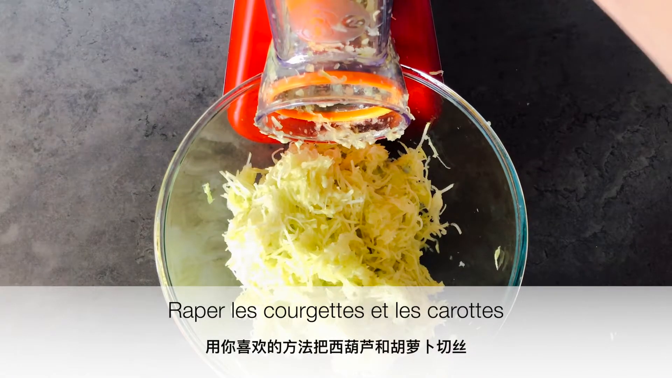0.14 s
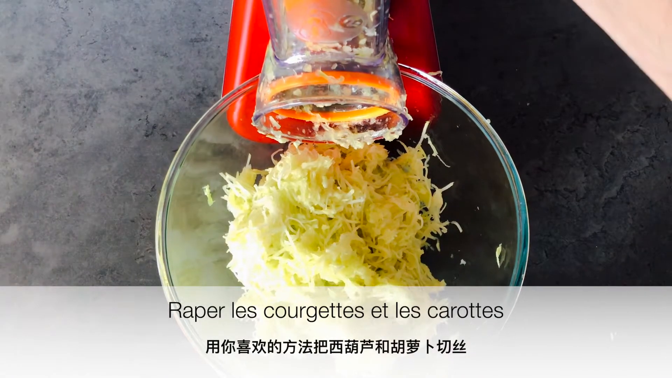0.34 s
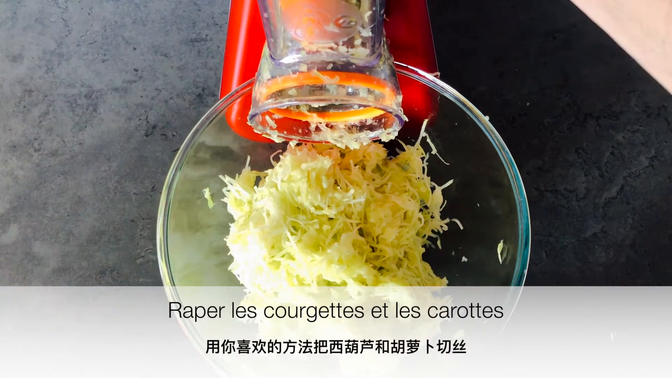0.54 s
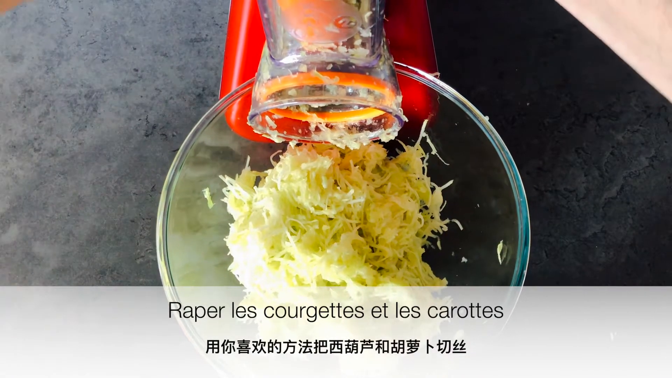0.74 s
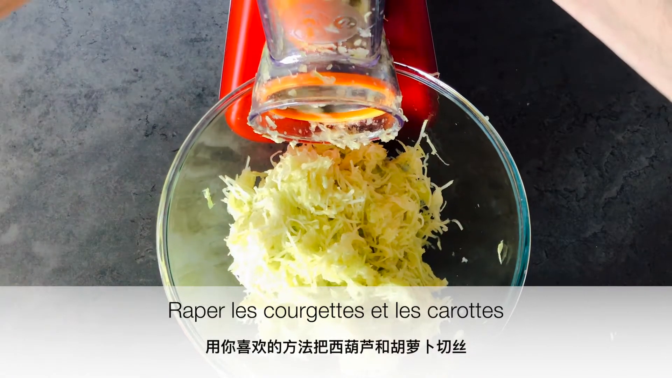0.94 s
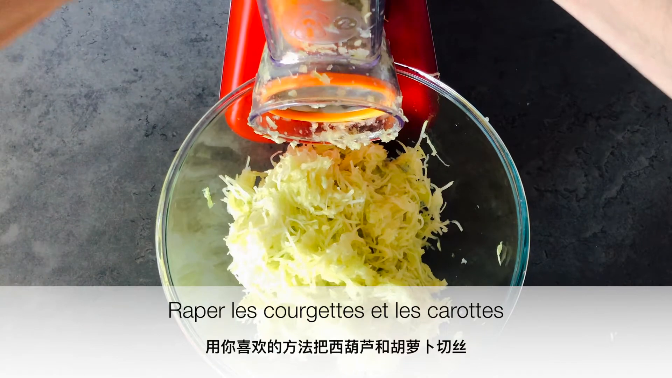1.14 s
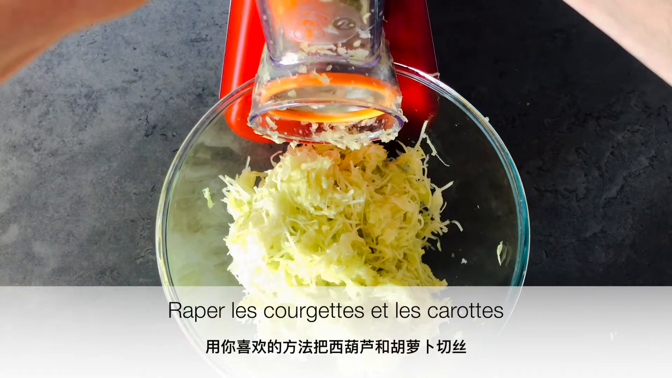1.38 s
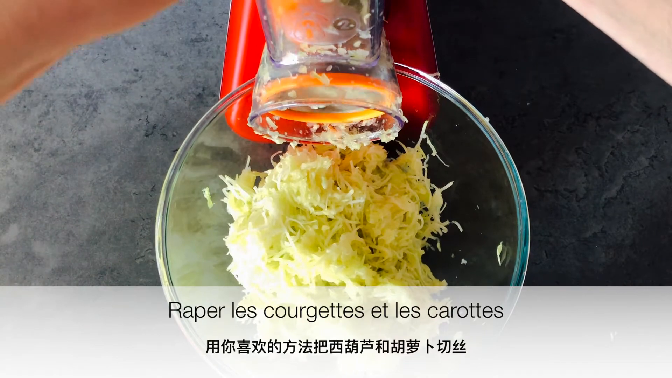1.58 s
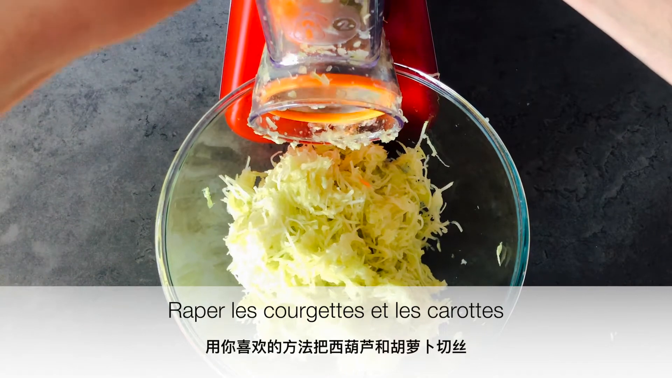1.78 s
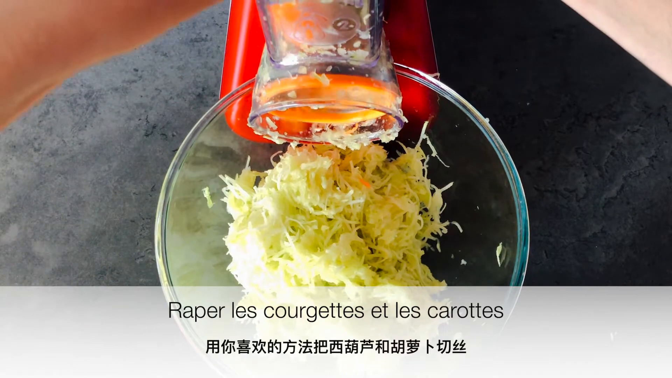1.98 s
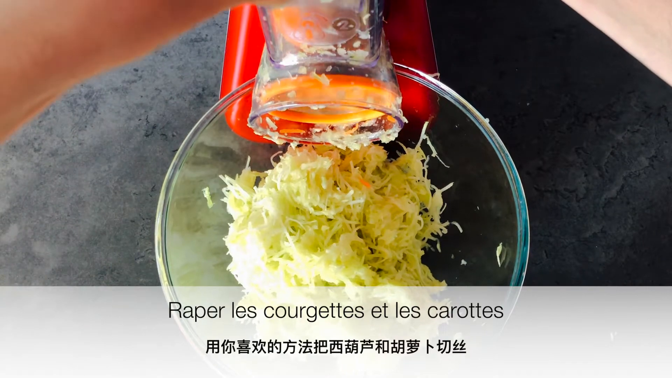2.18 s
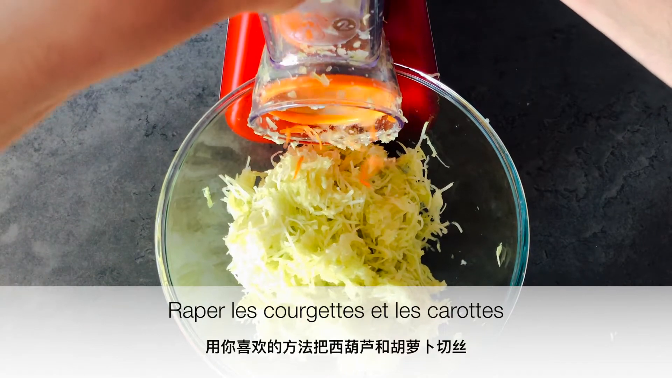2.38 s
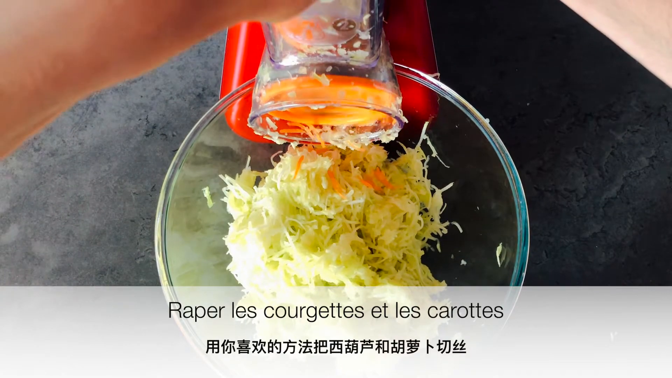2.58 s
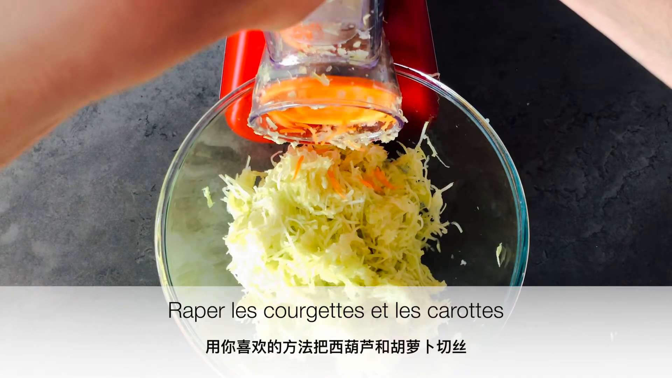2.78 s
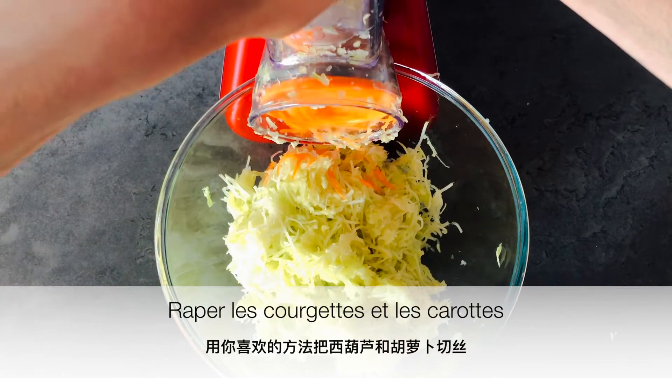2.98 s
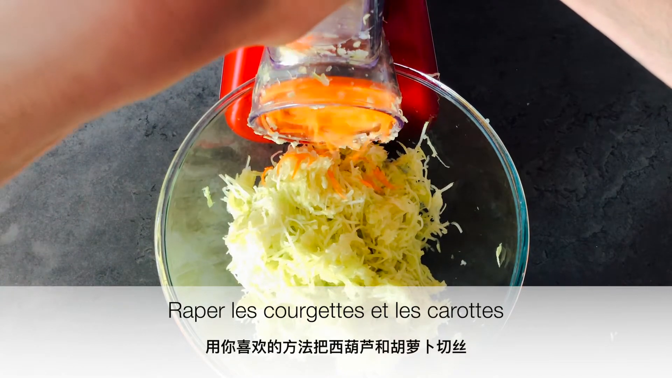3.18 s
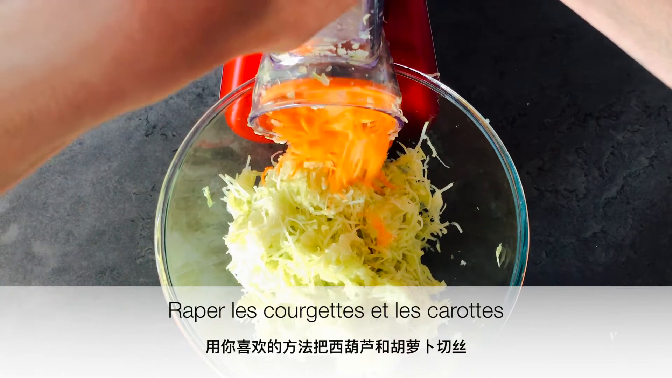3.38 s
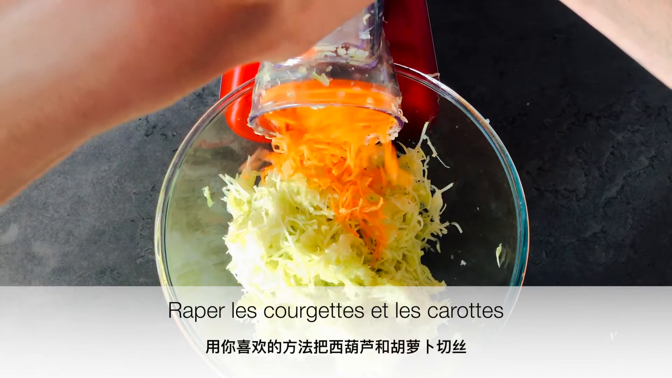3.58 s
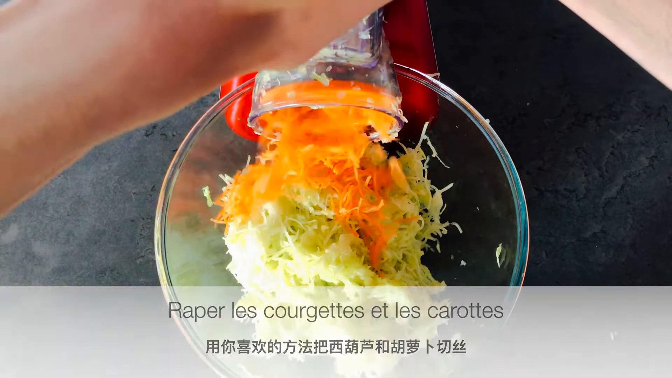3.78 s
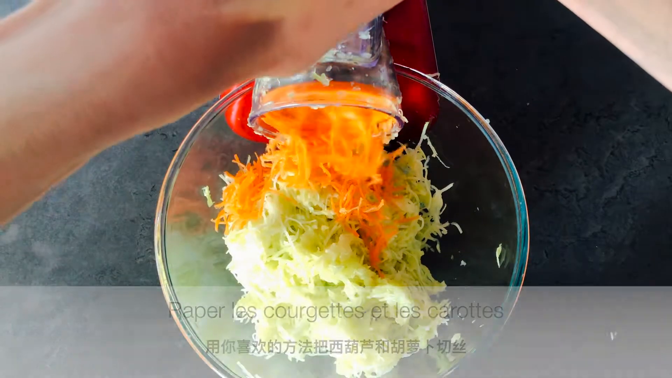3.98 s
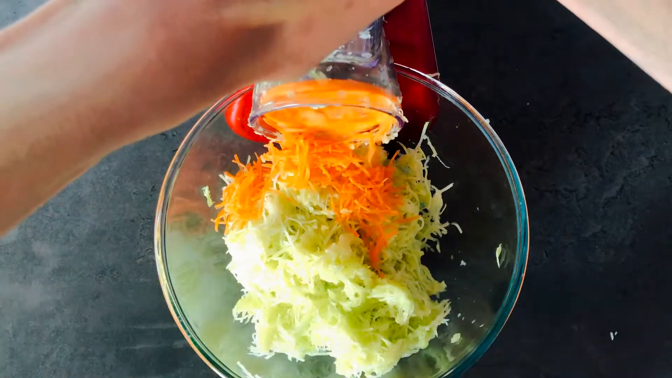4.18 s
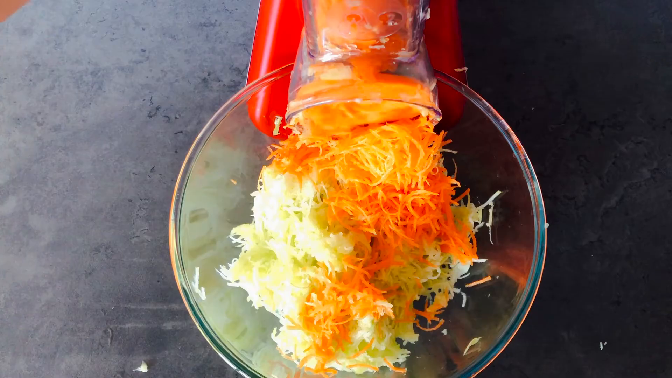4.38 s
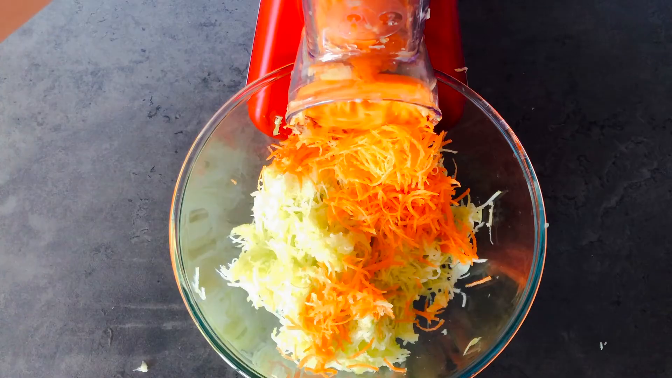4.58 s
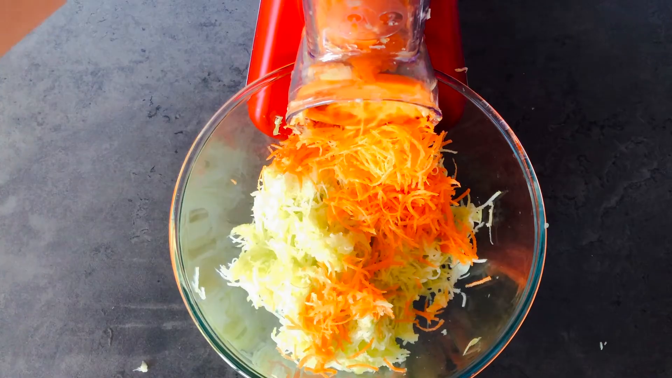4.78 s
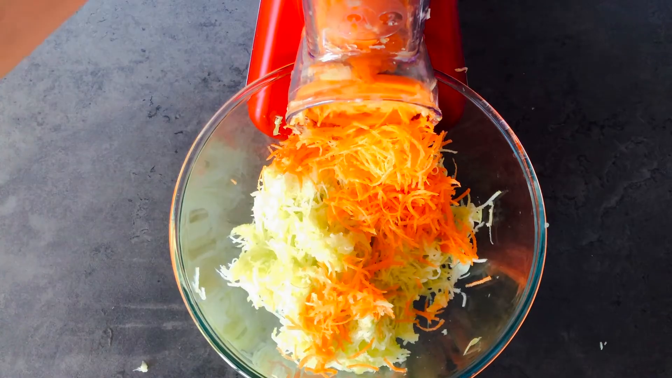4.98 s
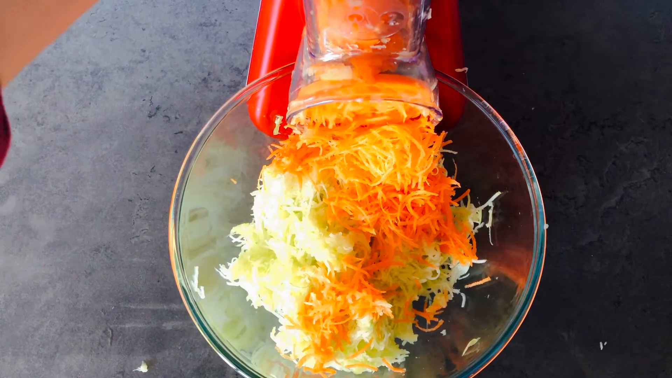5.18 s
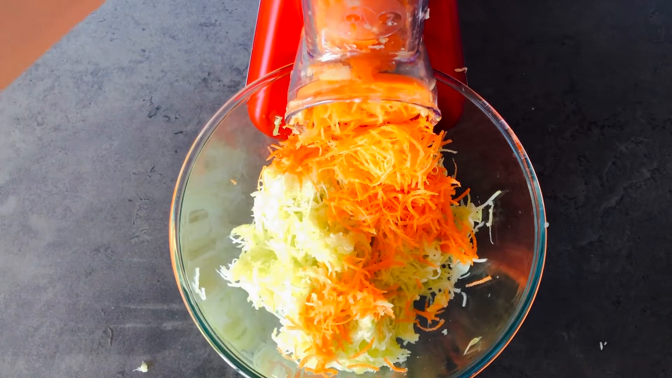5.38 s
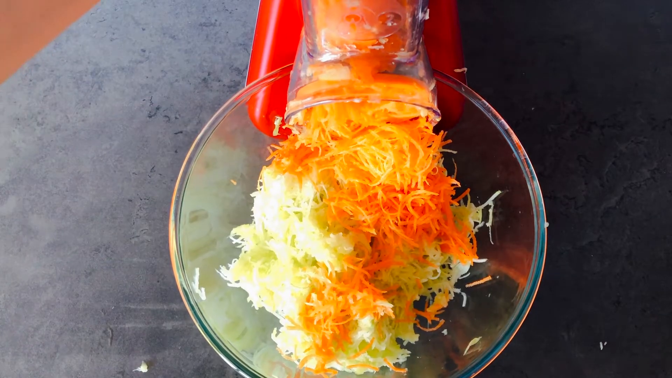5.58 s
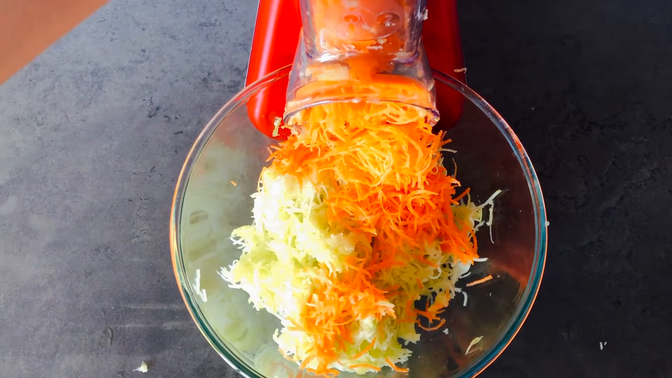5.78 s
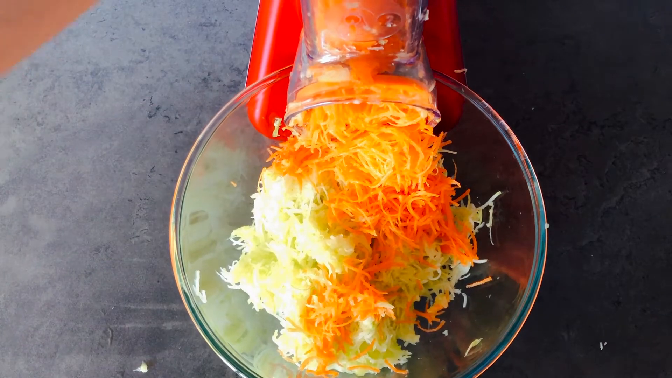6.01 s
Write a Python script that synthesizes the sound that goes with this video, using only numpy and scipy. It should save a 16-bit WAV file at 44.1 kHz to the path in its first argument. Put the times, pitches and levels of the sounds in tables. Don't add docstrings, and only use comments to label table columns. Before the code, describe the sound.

An electric vegetable grater is handled with clicks and thuds, whines up to a steady buzzing grind, then winds down to quiet and final bumps.

```python
import sys
import numpy as np
from scipy import signal
from scipy.fft import rfft, irfft, next_fast_len
from scipy.io import wavfile
from scipy.ndimage import uniform_filter1d

SR = 44100
rng = np.random.default_rng(int(sys.argv[2]) if len(sys.argv) > 2 else 0)


def decibels_to_gain(level_db):
    exponent = np.asarray(level_db, float) / 20
    return 10 ** exponent


def log_audio(samples):
    frames = np.atleast_2d(samples).T
    limited = np.clip(frames, -1, 1)
    pcm = np.round(limited * 32767).astype(np.int16)
    wavfile.write(sys.argv[1], SR, pcm)


N = 266800

PINION, WHEEL, DRUM_PINION = 7, 18, 13
SHAFT_RATIO = PINION / WHEEL
CUT_S = 4.2275
EMPTY_S = 4.11
OFF_S, REST_S = 4.235, 5.2

# (frequency [Hz], density [dB per Hz])
ROOM_COLOUR = [(24, -33.5), (40, -5), (54, -5), (106, -1), (126, -7), (193, -2), (219, -12), (255, -1.5),
               (275, -19.5), (327, -24.5), (410, -21), (766, -45), (15800, -53)]
# (frequency [Hz], t60 [s])
ROOM_DECAY = [(150, 0.58), (500, 0.48), (2000, 0.48), (6000, 0.3), (14000, 0.26)]
# (time [s], level [dB])
RUBS = [
    [(0.0, -77), (0.15, -90.5), (0.398, -95), (0.442, -70), (0.52, -73), (0.564, -77), (0.818, -79.5),
     (0.9, -79)],
    [(5.45, -80), (5.618, -86), (5.716, -90.5), (5.944, -86), (6.05, -71)],
]
# (frequency [Hz], density [dB per Hz])
RUB_COLOUR = [(180, -39), (300, -2), (654, -12.5), (772, -16), (1270, -17), (2060, -27), (2470, -27),
              (2820, -29), (15800, -47.5)]

# (time [s], strength [dB], brightness [dB], length [s])
CLICKS = [(0.3543, -45, -6, 0.0067), (0.376, -51, 4, 0.0058), (0.4732, -54.5, -13, 0.004),
          (0.482, -64, -48, 0.0058), (0.535, -84, 23, 0.005), (0.679, -75.5, 14.5, 0.0056),
          (0.6855, -60.5, 0, 0.0065), (0.772, -78, 9, 0.006), (0.782, -59, 2.5, 0.0052),
          (0.813, -64.5, -5, 0.006), (0.833, -76, 9, 0.004), (0.8635, -73, -24, 0.005),
          (0.898, -55, 7.5, 0.0077), (5.012, -50, 2, 0.0049), (5.536, -78, -12, 0.006),
          (5.897, -67.5, -14.5, 0.0087), (5.931, -66.5, -2, 0.0055), (5.973, -52, -18, 0.0064)]
# (frequency [Hz], width [Hz], gain [dB])
SHELL = [(1200, 110, -6), (1660, 140, 3.5), (2320, 204, -1.5), (2400, 220, -0.5), (3800, 680, 3),
         (4680, 440, 7.5), (7500, 1500, -2)]
# (frequency [Hz], density [dB per Hz])
SHELL_TILT = [(500, 23.5), (6000, -4), (9000, -10), (15000, -15.5)]
# (frequency [Hz], level [dB], t60 [s])
CHUTE_RINGS = [(2590, -19, .6), (2625, -26, .3), (2580, 5, .05), (3920, 7, .028), (1240, -12, .08),
               (2290, -9, .05), (5715, -12, .03), (6720, -12, .04), (7400, -16, .04)]
# (time [s], peak [dB], pitch [Hz], t60 [s])
PINGS = [(0.473, -67, 2550, 0.041), (0.479, -59, 1230, 0.058), (.358, -48, 635, 0.046),
         (.377, -53, 330, 0.036), (.536, -68, 6860, .025), (.537, -80, 6735, .04), (.687, -59, 824, 0.023),
         (0.686, -61, 2830, 0.025), (.688, -61, 3240, 0.019), (.686, -63, 4950, 0.024),
         (.687, -67, 1680, .03), (.773, -69, 3600, .02), (.784, -61.5, 1300, 0.039),
         (0.786, -67, 1604, 0.043), (.784, -75, 3200, 0.035), (.865, -66, 1297, 0.025),
         (.865, -62.5, 554, 0.026), (5.898, -71, 2280, 0.037), (5.9, -74, 1200, .07),
         (5.932, -72, 3800, .03), (5.932, -65, 1060, .04), (5.975, -72, 1630, .05),
         (5.975, -62, 2310, 0.035)]
# (time [s], peak [dB], pitch [Hz], t60 [s])
THUDS = [(0.363, -42.5, 355, 0.05), (0.388, -45, 382, 0.084), (0.425, -55, 378, 0.06),
         (0.484, -50.5, 318, 0.049), (0.482, -45, 650, 0.034), (0.697, -46.5, 361, 0.065),
         (0.732, -65, 404, 0.073), (0.786, -51, 315, 0.036), (0.819, -55.5, 355, 0.046),
         (0.868, -51, 354, 0.065), (0.889, -59, 340, 0.08), (0.899, -42, 310, 0.054),
         (5.019, -43, 377, 0.076), (5.2, -61, 608, 0.18), (5.539, -71, 396, 0.051),
         (5.649, -60, 340, 0.079), (5.874, -66, 250, 0.091), (5.9371, -48, 270, 0.032),
         (5.9755, -37.5, 316, 0.058), (5.976, -46, 495, 0.078)]
# (time [s], peak [dB], pitch [Hz], t60 [s])
EARLIER_THUD = [
    (.003, -65, 375, 0.19),
]
# (multiple of its pitch, level [dB])
THUD_MODES = [(.53, -1.5), (1, 10), (1.37, -5.5), (1.85, -14.5)]
# (time [s], peak [dB], pitch [Hz], length [s])
CREAKS = [
    (0.953, -30, 2300, 0.019),
    (5.23, -66, 13200, 0.017),
    (5.288, -54, 8800, 0.011),
    (5.32, -60, 8800, 0.011),
    (5.36, -60, 8900, 0.016),
    (5.401, -62, 12800, .005),
    (5.416, -72, 9000, .03),
    (5.5, -86.5, 8500, .015),
    (5.552, -81, 8500, 0.008),
    (5.744, -76, 7500, 0.043),
]

# (time [s], speed [Hz])
RUN_SPEED = [(0.9, 135.0), (0.97, 245.2), (1.01, 297.7), (1.05, 334.2), (1.1, 374.7), (1.2, 417.9),
             (1.27, 437.1), (1.35, 455.2), (1.45, 467.6), (1.55, 479.1), (1.67, 486.2), (1.8, 491.2),
             (1.95, 492.9), (2.25, 492.7), (2.45, 490.9), (2.55, 491.2), (2.75, 489.8), (2.89, 490.8),
             (3.12, 490.6), (3.25, 491.5), (3.62, 491.1), (3.75, 490.3), (3.87, 490.6), (3.99, 489.8),
             (4.08, 487.5), (4.13, 489), (4.2, 494.5), (4.229, 494.6)]
# (time [s], level [dB])
RATTLE_RUN = [(.9, -59), (.92, -57), (.954, -50), (1.1, -46), (1.35, -45.5), (1.82, -45), (4.08, -45),
              (4.23, -47.5)]
# (time [s], level [dB])
RATTLE_COAST = [(4.23, -49), (4.5, -52), (4.884, -55.5), (5.034, -57), (5.274, -64.5), (5.364, -71),
                (5.414, -76), (5.46, -85.5), (5.6, -102)]
# (frequency [Hz], density [dB per Hz])
COLOUR_RUN = [(35, -64), (60, -22.5), (184, -15.5), (238, -16.5), (353, -6.5), (426, -13), (490, -14),
              (550, -24.5), (604, -19.5), (1400, -18), (1600, -15.5), (2450, -15), (3550, -19.5),
              (4190, -22), (4930, -15.5), (5670, -21), (8230, -15.5), (15800, -26)]
# (frequency [Hz], density [dB per Hz])
COLOUR_COAST = [(35, -48.5), (60, -36), (146, 4), (286, -1), (362, -1), (711, -8), (1160, 1), (1690, -7.5),
                (2130, -2), (2280, -1), (2510, -9.5), (3560, -7.5), (4090, -11.5), (8630, -36),
                (15800, -46)]
CASING_RUN_HZ = [80, 105, 190, 378, 591, 874, 1085, 1141, 1270, 1482, 1725, 1851, 1992, 2250, 3830, 4815,
                 5000, 5720, 6140, 4875, 1945, 7180, 7480, 8130, 8760, 9810, 11600]
# (width [Hz], gain [dB])
CASING_RUN_SHAPE = [(18.25, -15.5), (13.17, 10.5), (30.2, 3), (40.3, 4.5), (13.1, 10), (17.5, 11.5),
                    (19.83, 1), (22.34, 8.5), (20.15, 6.5), (21.7, -1.5), (57.8, 6), (40, 6.5), (40.2, 7.5),
                    (60.3, 4), (70.8, 6), (90, 2.5), (250, -0.5), (45, 4), (44, 2.5), (40, 0.5), (40, -4),
                    (100.3, 6), (120, 5.5), (250, 5), (200, 3), (130, -1.5), (269, 2.5)]
# (frequency [Hz], width [Hz], gain [dB])
CASING_COAST = [(377, 147, 22.6), (640, 14, 5.8), (1200, 180, 1.7), (1703, 170, 9.2), (2300, 43, 4.3),
                (2650, 99, 8.3), (2960, 53, 6.5), (3520, 100, 0.5), (4000, 40, 2.9), (4470, 65, 7.6),
                (4930, 86, 7), (5230, 92, 7.4), (7500, 210, 2.2), (8500, 410, 4.6), (8900, 780, 9.1),
                (11650, 430, 6), (13700, 170, 2.6)]
# (level when slowest [dB], level when fastest [dB])
SHARES_RUN = [
    (-2, -7.5),
    (-23.5, -16),
    (-13, -10.5),
    (-21, -14),
]
# (level when slowest [dB], level when fastest [dB])
SHARES_COAST = [
    (-10, -9.5),
    (-9, -13.5),
    (-14, -9),
    (-25.5, -21.5),
]
# (time [s], level [dB])
SLEEVE_RUB = [(4.23, -84), (4.55, -55), (4.75, -74), (4.9, -62), (5.05, -59), (5.2, -65), (5.3, -66),
              (5.38, -90), (5.45, -94)]
# (frequency [Hz], width [Hz], gain [dB])
LOOSE_DRUM = [(990, 40, 22.5), (1086, 23, 19), (1494, 60, 15), (1834, 150, 11.5), (2120, 40, 15),
              (2445, 150, 15.5), (4780, 100, -3), (4950, 200, 8)]
# (rotor speed [Hz], level [dB])
BASE_RUN = [(135, -66), (245, -58.5), (320, -56), (350, -45), (375, -37.5), (398, -48.5), (410, -47.5),
            (422, -50), (445, -45.5), (462, -43), (478, -38.5), (491, -43.5), (560, -69)]
# (rotor speed [Hz], level [dB])
BASE_COAST = [(82, -86), (98, -72), (108, -63), (117, -84), (123, -84), (131, -62), (145, -64), (160, -68),
              (175, -58), (205, -60), (217, -67), (240, -65), (262, -65), (280, -53), (295, -51),
              (308, -53)]
# (time [s], length [s], countershaft multiple, level [dB])
SQUEALS = [(.98, .14, 40, -59), (1.0, .04, 15.5, -58), (1.0, .07, 13.4, -54), (1.04, .09, 26, -56),
           (1.09, .13, 54 / 7, -57), (1.13, .06, 34, -61), (1.14, .1, 31, -56), (1.12, .12, 39, -59),
           (1.23, .06, 32, -54), (1.26, .05, 47.7, -59), (1.29, .1, 41, -58), (1.31, .06, 9.7, -53),
           (1.37, .04, 18, -57), (1.45, .08, 45, -61), (1.46, .11, 20.5, -56), (4.24, .07, 15.5, -61),
           (4.27, .07, 20, -59), (4.35, .07, 49.5, -65), (4.42, .2, 36 / 7, -60), (4.48, .14, 4, -61),
           (4.48, .11, 13, -62), (4.48, .16, 26, -63), (4.63, .16, 12.8, -65), (4.66, .13, 36 / 7, -64),
           (4.74, .08, 26.7, -68), (4.75, .08, 54.5, -69), (4.82, .11, 39, -66), (4.85, .13, 7.2, -60),
           (4.89, .09, 12.3, -66)]

# (time [s], gear mesh level [dB], second multiple level [dB])
BITE = [(.9, -52, -64), (1.02, -60, -67.5), (1.05, -66, -66), (1.08, -49, -68), (1.11, -65.5, -62),
        (1.15, -66, -66), (1.175, -72, -60), (1.2, -58, -60), (1.25, -61, -64), (1.3, -50, -57),
        (1.38, -62, -60), (1.43, -59, -51.5), (1.55, -56, -58.5), (1.65, -53, -53.5), (1.75, -62, -50.5),
        (1.95, -57, -54), (2.1, -56, -56), (2.25, -50.5, -55.5), (2.35, -59.5, -58.5), (2.45, -52, -54.5),
        (2.7, -56, -57), (2.85, -51.5, -59), (3.05, -52.5, -53.5), (3.14, -47.5, -52), (3.21, -55, -65.5),
        (3.28, -53, -51.5), (3.36, -49, -51.5), (3.7, -51, -49), (3.85, -54.5, -49.5), (3.94, -57, -48),
        (4.07, -62.5, -49), (4.14, -65, -62), (4.229, -66, -59.5)]
# (frequency [Hz], width [Hz], gain [dB])
GEARBOX = [(1610, 36, 10.5), (1800, 25, 5), (2126, 120, 11.5), (2315, 34, 6), (3720, 170, 7),
           (4350, 240, 9.5), (4890, 140, 2.5), (5095, 200, 2.5)]
SHAFT_ORDERS = [9, 14, 15, 16, 18, 27, 40 / 3, 79 / 3, 25, 54, 58, 36 / 7, 54 / 7, 17 / 3, 34 / 3, 43 / 3,
                17, 20, 20.83, 80 / 3, 82 / 3, 30, 4, 38, 29 / 7, 51.4]
SHAFT_DB = [-62, -61.5, -65.5, -68, -64.5, -58.5, -63, -63.5, -69, -73, -74, -65, -68, -70.5, -66, -68, -72,
            -70, -71, -68.5, -72, -72, -69, -70, -67, -77.5]
STRAIN_ORDERS = [54 / 7, 12, 14, 25, 27, 40]
STRAIN_DB = [-64, -66, -68, -66, -68, -68]
# (frequency [Hz], width [Hz], gain [dB])
STRAIN_RINGS = [(1150, 100, 5), (1780, 150, 6), (4550, 250, 4), (5330, 260, 6), (6150, 400, 7)]


def evened(x):
    return x / np.sqrt(np.mean(x ** 2) + 1e-20)


def read(points, hz):
    f, value = np.transpose(points)
    return np.interp(np.log(hz + 1), np.log(f + 1), value)


def bumps(peaks, hz):
    return sum(gain / (1 + (2 * (hz - f) / width) ** 2) for f, width, gain in peaks)


def add(mix, s, sound):
    part = mix[round(s * SR):][:len(sound)]
    part += sound[:len(part)]


def unroll(rows):
    s, *columns = np.transpose(rows)
    t = np.arange(s[0], s[-1], 1 / SR)
    return s[0], [np.interp(t, s, column) for column in columns]


def coloured(x, colour, peaks=(), lo_hz=0, hi_hz=30000):
    size = next_fast_len(len(x))
    hz = np.fft.rfftfreq(size, 1 / SR)
    db = read(colour, hz) + bumps(peaks, hz)
    low_edge = 1 + (lo_hz / (hz + 1)) ** 12
    high_edge = 1 + (hz / hi_hz) ** 12
    edges = 1 / np.sqrt(low_edge * high_edge)
    return evened(irfft(rfft(x, size) * decibels_to_gain(db) * edges, size)[:len(x)])


def drift(n, hz):
    lowpass = signal.butter(2, hz, fs=SR, output="sos")
    return evened(signal.sosfilt(lowpass, rng.standard_normal(n)))


def tone(turns, db, flutter_db, flutter_hz, blur):
    wobble = evened(decibels_to_gain(flutter_db * drift(len(turns), flutter_hz)))
    phase = 2 * np.pi * turns + blur * drift(len(turns), flutter_hz)
    return np.sqrt(2) * decibels_to_gain(db) * wobble * np.sin(phase)


def patchy(x, db):
    z = signal.stft(x, nperseg=1024)[2]
    a, b = rng.standard_normal((*z.shape, 2)).transpose(2, 0, 1)
    patches = uniform_filter1d(uniform_filter1d(a, size=4, axis=0), size=5, axis=1)
    streaks = uniform_filter1d(uniform_filter1d(b, size=2, axis=0), size=12, axis=1)
    gain = decibels_to_gain(db * (evened(patches) + 1.15 * evened(streaks)))
    return evened(signal.istft(z * gain, nperseg=1024)[1][:len(x)])


def kitchen(x):
    hz, t, z = signal.stft(rng.standard_normal(SR // 2), SR, nperseg=256)
    decay = decibels_to_gain(-60 * t / read(ROOM_DECAY, hz)[:, None])
    tail = signal.istft(z * decay, SR, nperseg=256)[1]
    return signal.fftconvolve(x, tail / np.linalg.norm(tail))[:N]


def background():
    out = decibels_to_gain(-71) * coloured(rng.standard_normal(N), ROOM_COLOUR, [(81.0, 15, -13.0)])
    for rows in RUBS:
        s, (db,) = unroll(rows)
        skin = coloured(rng.standard_normal(len(db)), RUB_COLOUR)
        add(out, s, decibels_to_gain(db + 1.9 * drift(len(db), 40)) * skin)
    return out


def clicks():
    out, t, long = np.zeros(N), np.arange(4096) / SR, np.arange(SR // 3) / SR
    for k, (s, knock_db, bright_db, length) in enumerate(CLICKS):
        click_db = knock_db - 8.5 + 0.22 * bright_db
        tick_db = knock_db + bright_db
        chatter = rng.standard_normal(len(t)) * decibels_to_gain(2.6 * drift(len(t), 650))
        fade_db = -60 * np.maximum(t - length, 0) / 0.031
        knock = decibels_to_gain(knock_db - 2.5 - 280 * t) * coloured(chatter, SHELL_TILT, SHELL, 380, 2500)
        knock *= 1 - np.exp(-t / 0.0019)
        click = decibels_to_gain(click_db + 1.5 - 1000 * t) * coloured(chatter, SHELL_TILT, SHELL, 2300, 6400)
        tick = decibels_to_gain(tick_db - 6.0 - 2000 * t) * coloured(chatter, SHELL_TILT, SHELL, 6600)
        add(out, s, (1 - np.exp(-t / 0.0001)) * decibels_to_gain(fade_db) * (knock + click + tick))
        if k < 2:
            swell = 1 - np.exp(-long / .0015)
            for hz, db, t60 in CHUTE_RINGS:
                add(out, s, swell * tone(hz * long, click_db + db - 60 * long / t60, 3, 50, .7))
    return out


def pings():
    out, t = np.zeros(N), np.arange(4096) / SR
    for s, peak_db, hz, t60 in PINGS:
        ring = tone(hz * t, peak_db + 1 - 60 * t / t60, 3, 150, .8)
        add(out, s, (1 - np.exp(-t / .0012)) * ring)
    return out


def thuds():
    out, t = np.zeros(N), np.arange(SR // 3) / SR
    for s, peak_db, hz, t60 in THUDS + EARLIER_THUD:
        modes = sum(decibels_to_gain(db) * np.sin(2 * np.pi * (k * hz * t + rng.random())) for k, db in THUD_MODES)
        blow = modes * (1 - np.exp(-t / 0.00094)) ** 2 * decibels_to_gain(-60 * t / t60)
        add(out, s - .002, decibels_to_gain(peak_db) * blow / abs(blow).max())
    return out


def creaks():
    out = np.zeros(N)
    for s, db, hz, length in CREAKS:
        n = round(length * SR)
        rub = coloured(rng.standard_normal(4096), [(100, 0), (9000, 0)], (), hz * 0.69, hz * 1.0)
        add(out, s, decibels_to_gain(db - 21.0) * rub[:n] * signal.windows.tukey(n, .4))
    return out


def run_hz(t):
    return np.interp(t, *np.transpose(RUN_SPEED))


def coast_hz(t):
    u = np.clip(t, OFF_S, REST_S) - OFF_S
    return 308.4 - 270 * u + 29 * u ** 2


def sleeve():
    s, (db,) = unroll(SLEEVE_RUB)
    rub = coloured(rng.standard_normal(len(db)), [(100, 0), (9000, 0)], [(3540, 200, 16)], 3200, 4000)
    return s, decibels_to_gain(db - 2.5) * rub


def coasting():
    hz = coast_hz(np.arange(OFF_S, REST_S, 1 / SR))
    return OFF_S, tone(np.cumsum(hz) / SR, read(BASE_COAST, hz), .8, 20, .2)


def loose_drum():
    t = np.arange(round((CUT_S - EMPTY_S) * SR)) / SR
    chatter = coloured(rng.standard_normal(len(t)), [(100, -12.0), (9000, -3)], LOOSE_DRUM, 870, 5900)
    return EMPTY_S, decibels_to_gain(-47) * chatter * np.clip(t / 0.027, 0, 1)


def squeals():
    out = np.zeros(N)
    for s, length, order, db in SQUEALS:
        t = np.arange(0, length, 1 / SR)
        hz = run_hz(s + t) if s < CUT_S else coast_hz(s + t)
        turns = order * np.cumsum(hz * SHAFT_RATIO) / SR
        add(out, s, signal.windows.tukey(len(t), .5) * tone(turns, db - 1.5, 2.5, 45, .6))
    return out


def rattle(rows, speed, shares, colour, casing, throb, grit_db, patch_db, top_hz):
    s, (level_db,) = unroll(rows)
    t = s + np.arange(len(level_db)) / SR
    hz = speed(t)
    pace = (hz - hz.min()) / np.ptp(hz)
    thrum_db, buzz_db, hiss_db, air_db = (slow + (fast - slow) * pace for slow, fast in shares)
    shaft = np.cumsum(hz * SHAFT_RATIO) / SR
    beat = 1 + throb * np.cos(2 * np.pi * shaft)
    grit = decibels_to_gain(grit_db * drift(len(t), 66))
    drive = patchy(rng.standard_normal(len(t)), patch_db) * beat * grit
    thrum = decibels_to_gain(thrum_db) * coloured(drive, colour, casing, 0, 600)
    buzz = decibels_to_gain(buzz_db) * coloured(drive, colour, casing, 520, 810)
    teeth = coloured(drive, colour, casing, 1047, 6000)
    hiss = decibels_to_gain(hiss_db) * coloured(drive, colour, casing, 5550, 10130)
    air = decibels_to_gain(air_db) * coloured(drive, colour, casing, 11200, top_hz)
    return s, decibels_to_gain(level_db) * (thrum + buzz + teeth + hiss + air)


def whine():
    s, mesh_db = unroll(BITE)
    t = np.arange(len(mesh_db[0])) / SR
    hz = run_hz(s + t)
    pace = hz / hz.max()
    shaft_hz = hz * SHAFT_RATIO
    shaft = np.cumsum(shaft_hz) / SR
    strain = np.clip((1 - pace) / 0.17, 0, 1) * pace ** 1.9

    gears = np.zeros(len(t))
    for k, db in enumerate([*mesh_db, -69], 1):
        order = k * DRUM_PINION
        ring_db = bumps(GEARBOX, order * shaft_hz)
        gears += tone(order * shaft, db + ring_db, 1.0 + .5 * strain, 18, 0.12 * k * (1 + 2.5 * strain))

    load = np.clip((EMPTY_S - s - t) / 0.028, .2, 1)
    for order, db in zip(SHAFT_ORDERS, SHAFT_DB):
        gears += load * pace ** 4 * tone(order * shaft, db, 2.5, 12, .3)
    for order, db in zip(STRAIN_ORDERS, STRAIN_DB):
        ring_db = bumps(STRAIN_RINGS, order * shaft_hz)
        gears += strain * tone(order * shaft, db + 1.5 + ring_db, 4, 45, .8)

    grip = np.clip(t / .14, 0, 1) ** 2
    rise = np.clip(t / .06, 0, 1) ** 2
    unbalance = tone(shaft / SHAFT_RATIO, read(BASE_RUN, hz), 0.19, 7.9, 0.28)
    return s, grip * gears + rise * unbalance


def scene():
    hits = clicks() + pings() + thuds() + creaks()
    mix = hits + decibels_to_gain(-11.5) * kitchen(hits) + background() + squeals()
    casing_run = [(hz, *shape) for hz, shape in zip(CASING_RUN_HZ, CASING_RUN_SHAPE)]
    add(mix, *rattle(RATTLE_RUN, run_hz, SHARES_RUN, COLOUR_RUN, casing_run, 0.033, 0.67, 0.97, 17000))
    add(mix, *rattle(RATTLE_COAST, coast_hz, SHARES_COAST, COLOUR_COAST, CASING_COAST,
                     0.048, 0.92, 1.73, 14500))
    for source in (whine, coasting, sleeve, loose_drum):
        add(mix, *source())
    return np.array([mix, mix])


def gate_faint_treble(x):
    hz, _, z = signal.stft(x, SR, nperseg=1024)
    power = uniform_filter1d(uniform_filter1d(abs(z) ** 2, size=16, axis=1), size=3, axis=2)
    threshold_db = -121 + .0045 * (hz[:, None] - 13200)
    keep = (power > decibels_to_gain(2 * threshold_db)) | (hz[:, None] < 13200)
    return signal.istft(z * keep, SR, nperseg=1024)[1][:, :N]


def band_limit(x):
    return signal.sosfilt(signal.butter(12, 15820, fs=SR, output="sos"), x)


def record(dry):
    heard = signal.sosfilt(signal.butter(6, 55, "high", fs=SR, output="sos"), dry)
    for channel in heard:
        add(channel, CUT_S, decibels_to_gain(-49) * signal.windows.hann(200))
    return band_limit(gate_faint_treble(heard))


dry = scene()
out = record(dry)
log_audio(out)
```